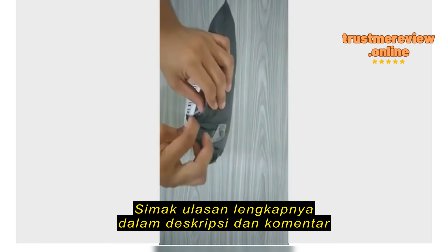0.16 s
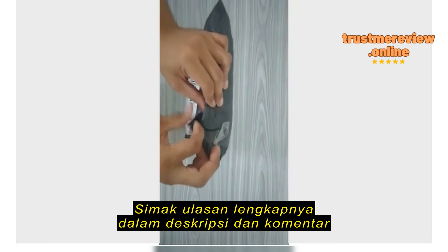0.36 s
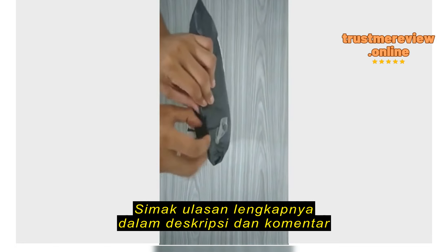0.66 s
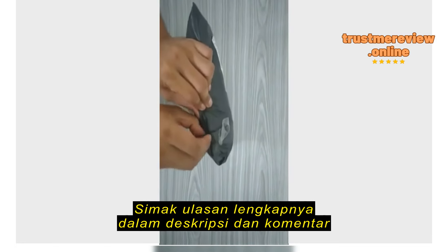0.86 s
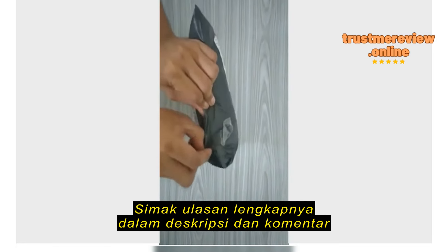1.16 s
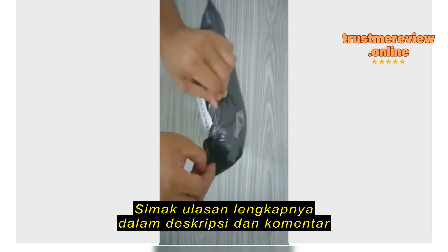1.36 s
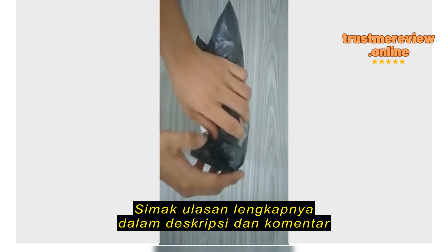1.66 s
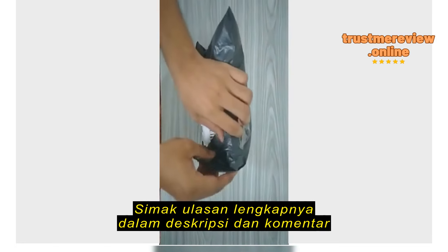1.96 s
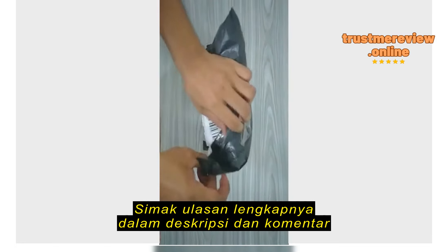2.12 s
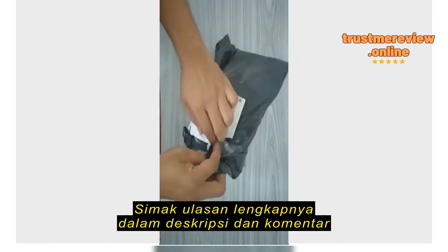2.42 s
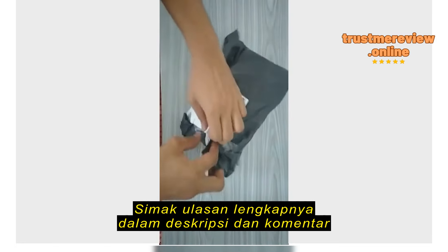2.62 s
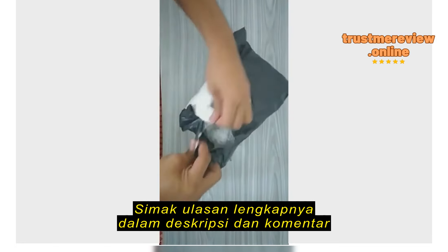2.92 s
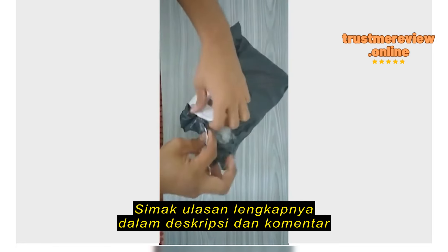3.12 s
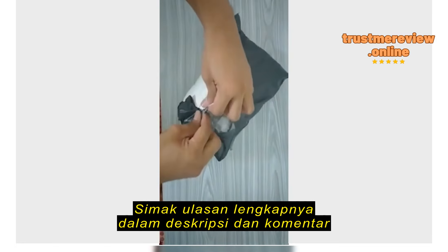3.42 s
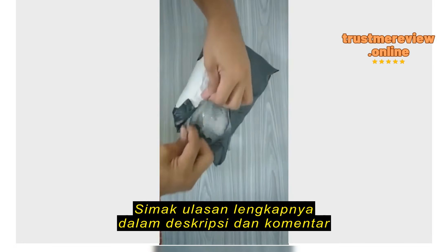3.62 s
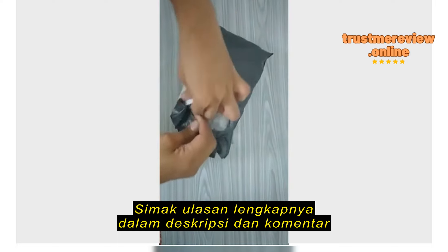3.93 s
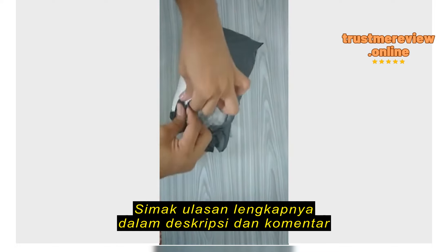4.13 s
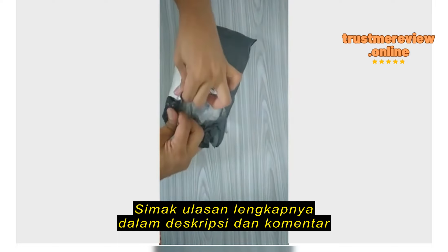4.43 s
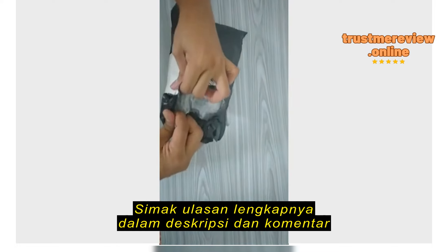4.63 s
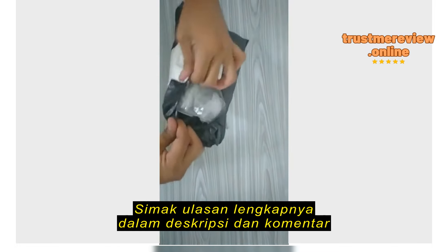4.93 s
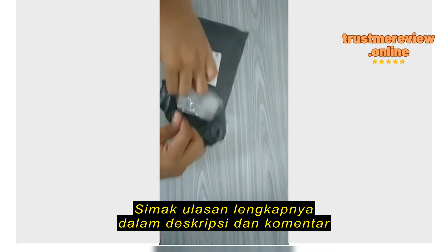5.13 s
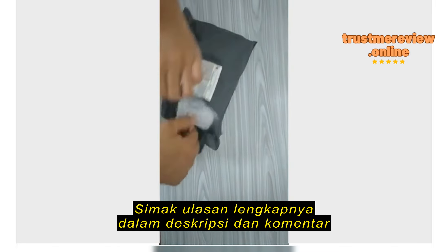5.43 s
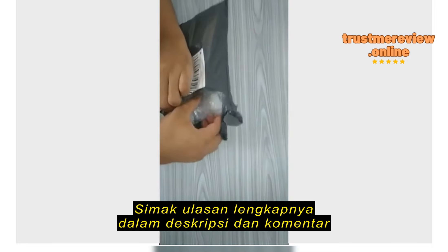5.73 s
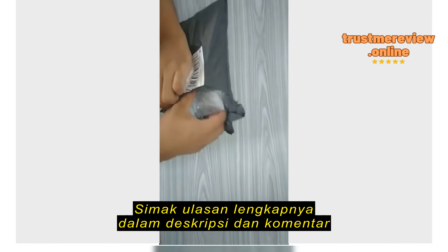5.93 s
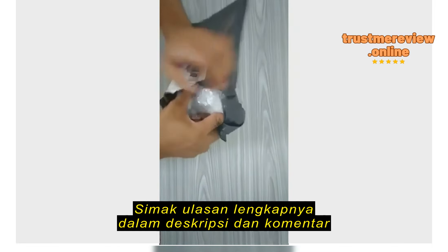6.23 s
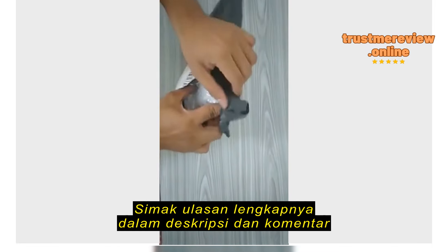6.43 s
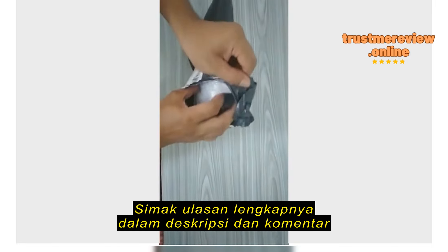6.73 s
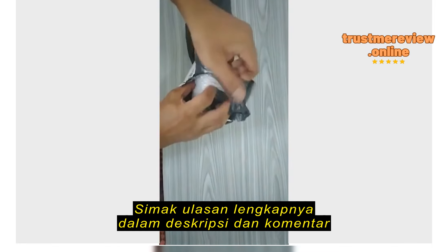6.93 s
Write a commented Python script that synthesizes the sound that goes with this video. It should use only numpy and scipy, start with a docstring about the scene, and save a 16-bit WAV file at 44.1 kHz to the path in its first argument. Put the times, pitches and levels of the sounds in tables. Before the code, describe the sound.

Hands squeeze and pull at a thin plastic mailer bag on a wooden table, making short, uneven bursts of crinkling with sharp little snaps. About two seconds in, the bag tears with one loud crack and a rush of crackle, and the table thumps softly. Crinkling continues as the bundle inside rustles and shuffles. The microphone is close, in a small room with a faint low rumble.

```python
"""A snap and a burst of crackle: hands tear open a thin plastic mailer bag on a wooden table.
Creases in the film buckle as swarms of tiny clicks and a few loud snaps. The bundle inside pops and
shuffles, and the table top booms in its low modes when the bag is slapped down. A small room
reverberates over a low rumble, and a phone close above hears it all through two microphone ports."""
import sys
import numpy as np
from scipy import signal
from scipy.fft import rfft, irfft, next_fast_len
from scipy.io import wavfile

SR = 44100
rng = np.random.default_rng(int(sys.argv[2]) if len(sys.argv) > 2 else 0)


def store_pcm(level_fs):
    """Save levels as 16-bit WAV."""
    pcm = np.round(np.clip(level_fs, -1, 1) * 32767).astype(np.int16)
    wavfile.write(sys.argv[1], SR, np.atleast_2d(pcm).T)


N = 311787
SIZE = next_fast_len(N + SR)
HZ = np.arange(SIZE // 2 + 1) * SR / SIZE + 1e-3
LAG_S, PORT_GAP_S = .00004, .00043  # the left port's delay; travel time from port to port

# Squeezes and pulls of the hands: (full from [s], let go [s], fade [dB/s], crackle level [dB],
# treble tilt [dB/octave], bundle rustle re crackle [dB], shuffle re crackle [dB])
CRUMPLES = [(0.01, 0.15, 112, -43.0, -0.5, -4.0, -12.5), (0.326, 0.399, 348, -50.0, -0.5, -5.5, -11.5),
            (0.39, 0.6, 100.0, -50.0, 0, -4, -9), (0.684, 0.69, 290.0, -52.5, -1, -9, -26.0),
            (0.863, 0.885, 130.0, -46.5, 0.5, -3.5, -13), (1.048, 1.12, 230.0, -54.5, -2.5, -4, -13),
            (1.133, 1.13, 280.0, -51, 3, -7, -15.0), (1.201, 1.235, 380.0, -48.0, 2.0, -5.5, -10),
            (1.263, 1.303, 120.0, -47.0, -1, -6.5, -12), (1.371, 1.42, 340.0, -55.5, -3, -2.5, -18),
            (1.525, 1.524, 210.0, -48.0, -0.5, -6.5, -9), (1.642, 1.73, 160.0, -50.0, -1, -3, -12),
            (1.857, 2, 130.0, -56.5, -2.0, -11, -15), (1.948, 1.9, 82, -50.5, 0.5, -3.5, -8.0),
            (2.128, 2.17, 125, -37.5, -0.5, -4.5, -10), (2.177, 2.196, 400.0, -34.5, -1, -5, -10.0),
            (2.268, 2.6, 80.0, -53.5, -3.5, -3.5, -7), (2.67, 2.68, 370.0, -47.0, -1, -6, -10.5),
            (2.867, 2.966, 170.0, -45.0, -0.5, -6.5, -11.5), (3.035, 3.13, 190.0, -51.0, -1.0, -7, -17.5),
            (3.107, 3.27, 130.0, -48.0, -1.5, -4.5, -9.5), (3.382, 3.45, 70.0, -45.5, -1, -1, -17),
            (3.507, 3.75, 390.0, -52.0, 0, 0, -5), (3.862, 3.974, 190.0, -50.5, -1.5, -5, -15),
            (4.038, 4.048, 400.0, -48.5, 2, -10.0, -6), (4.018, 4.3, 90.0, -52.5, 0, -2, -8),
            (4.192, 4.262, 330.0, -43.5, 0, -7, -10), (4.399, 4.431, 120.0, -44.0, 1.0, -9.5, -11),
            (4.566, 4.66, 80.0, -49.0, 0, -5, -6), (4.76, 4.784, 250.0, -48.5, 1, -12, -9),
            (4.896, 5, 90.0, -50.0, 0, -5.5, -13.0), (5.043, 5.13, 250.0, -44.5, 0.5, -5.0, -12.0),
            (5.171, 5.215, 150.0, -46.5, 0, -9, -11), (5.264, 5.32, 220.0, -44.5, 1.5, -11, -11.0),
            (5.317, 5.54, 200.0, -50.0, 0.5, -5, -6), (5.595, 5.613, 100.0, -50, 0, -5, -9),
            (5.862, 5.85, 180.0, -54.0, 0.5, -11, -25), (6.137, 6.35, 90.0, -56.5, -0.5, -4, -26.0),
            (6.436, 6.452, 320.0, -36.0, 1, -8, -17), (6.49, 6.48, 150.0, -46.5, 0, -4, -15),
            (6.596, 6.691, 240.0, -52.0, -0.5, -4.5, -8.5), (6.711, 6.84, 107, -48.0, 1, -7.5, -11),
            (6.898, 6.96, 170.0, -41.0, 0, -8.5, -12), (7.07, 7.07, 170.0, -54, -4, -11, -7)]
# Resonances of the film, from wide creases to fine: (frequency [Hz], level [dB])
CREASES = [(2300, -3), (3400, 0), (5000, -0.5), (7200, -5.5), (10000, -6.5), (13500, -1)]
# Modes of the bundle: (frequency [Hz], level [dB], T60 [s])
BUNDLE_MODES = [(650, -12, 0.028), (780, -3, 0.018), (1028, 2.5, 0.008), (1400, -5, 0.013),
                (1650, -5, 0.018), (2020, -1, 0.008)]


def crackle(tick_db=-10.5, creep_db=-60, creep_db_per_octave=-2.5):
    """Buckling: stressed film sheds dense clicks and stray ticks, their energy wandering among creases."""
    clicks = film(*swarm(5000, spread_db=2.1, flurry_db=1.1, flurry_hz=60), patchy_db=2, smear_s=.0008)
    ticks = film(*swarm(110, spread_db=1.5, flurry_db=1.6, flurry_hz=5), patchy_db=4.5, smear_s=.0002)
    level_db, tilt_db = np.transpose(CRUMPLES)[3:5, :, None]
    out = 0
    for click, tick, (hz, _) in zip(clicks, ticks, CREASES):
        octaves = np.log2(hz / 7000)
        band = click / rms(sum(clicks)) + undb(tick_db) * tick / rms(sum(ticks))
        envelope = handling(level_db + tilt_db * octaves, creep_db + creep_db_per_octave * octaves)
        out += band * wander(spread_db=1.3, per_s=35) * envelope
    return out


def snaps(count=10):
    """Snap-through: a big crease cracks, then smaller cracks run along the fold for milliseconds."""
    # (time [s], level [dB], then re that level: low bundle modes [dB],
    # high bundle modes and wide creases [dB], fine creases [dB])
    cracks = [(0.006, -31.5, 0.5, -5, -24), (0.255, -32, -30, -19.5, -18), (0.5234, -31, -17, -30.5, -15),
              (0.6754, -31, -40.5, -25.5, -10), (0.752, -40, -30, -30, -10), (0.828, -43, -28, -31.5, -9),
              (0.8473, -19, -41, -32, -18), (0.9486, -36, -30, -30, -12), (1.09, -37, -30, -25, -12),
              (1.183, -37, -35, -35, -20), (1.195, -39, -29.5, -33, 2.5), (1.207, -37, -30, -30, -7),
              (1.256, -15, -27, -19, -14.5), (1.3884, -31, -32, -28, -18), (1.5065, -41, -30, -30, -12),
              (1.6633, -27, -28, -24, -15.5), (1.7064, -32, -32, -30, -12), (1.83, -37.5, -30, -12, -13.5),
              (1.849, -26, -45, -29, -19), (2.116, -30, -7, -10, -20), (2.1271, 0.5, -30.5, -28.5, -19),
              (2.165, -11.5, -12.5, -21, -12), (2.181, -19, -9, -18, -12), (2.2884, -22.5, -35, -24, -28),
              (2.6597, -31, -21, -29.5, -17.5), (2.6794, -23.5, -24, -40, -19),
              (2.8096, -42, -30, -30, -13), (3.026, -34, -30, -30, -14), (3.041, -27, -15, -32, -23.5),
              (3.0764, -30, -26, -31, -21), (3.1186, -25.5, -15, -32, -26), (3.2135, -14.5, -20, -12, -27),
              (3.4137, -24.5, -2, -1.5, -18.5), (3.4946, -20.5, -33, -28, -16.5),
              (3.915, -32, -20, -7, -21), (3.926, -42, -7, -25, -20), (3.9444, -31, -23.5, -24, -10),
              (3.962, -34, -22, -30, -12), (4.0101, -32, -36, -29, -6.5), (4.0644, -31.5, -21, -17.5, -21),
              (4.09, -27, -33.5, -25, -16), (4.281, -34, -30, -30, -17), (4.5753, -28.5, -10, -37, -20),
              (4.593, -28, -30, -35, -17), (4.598, -30.5, -30, -35, -15), (4.6327, -30, -23, -35, -14),
              (4.6447, -28, -19, -40, -9), (4.7195, -31, -39, -39, -5.5), (4.811, -37, -35, -35, -13),
              (4.8664, -27.5, -45, -40, -11), (4.908, -36, -35, -35, -10), (4.967, -33, -35, -35, -14),
              (5.108, -33, -35, -35, -12), (5.437, -35, -35, -35, -8), (5.49, -33, -35, -35, -8),
              (5.62, -36, -35, -35, -8), (5.69, -36, -25, -25, -20), (5.7389, -33, -32, -23, -20),
              (5.8253, -43, -28, -33, -12), (5.8486, -32, -41, -34, -20), (5.9472, -35.5, -35, -36, -10.5),
              (6.1097, -36.5, -18, -20, -18), (6.139, -30.5, -26, -23.5, -23),
              (6.1604, -36.5, -25, -25, -12.5), (6.2694, -35.5, -16, -28.5, -10),
              (6.345, -41, -27, -26.5, -10), (6.388, -38, -8, -20, -15), (6.429, -31, -13, -28.5, -12),
              (6.6224, -35, -25, -25, -13), (6.739, -33, -27, -30, -13)]
    onset_s, level_db, deep_db, pop_db, fine_db = np.transpose(cracks)[:, :, None]
    jitter, place, polarity = rng.random((len(cracks), count, 3)).transpose(2, 0, 1)
    later = np.arange(count) > 0
    delay_s = .00066 + .006 * (np.arange(count) + jitter) / count * later
    ragged_db = -9.5 - .09 * level_db - 670 * delay_s - 5.8 * place  # weaker snaps are more ragged
    size = undb(level_db) * np.where(later, np.sign(polarity - .5) * undb(ragged_db), 1)
    lag_s = (LAG_S + .25 * PORT_GAP_S * (2 * place - 1) * later).ravel()
    s = (onset_s + delay_s).ravel()

    def impulses(db):
        return s, (size * undb(db)).ravel(), lag_s

    middle, wide, fine = (film(*impulses(db), patchy_db=1, smear_s=.00005) for db in (0, pop_db, fine_db))
    crack = undb(15) * sum(wide[:2]) + undb(9.5) * sum(middle[2:4]) + undb(25.5) * sum(fine[4:])
    deep = bundle_ring(arrive(*impulses(deep_db)), BUNDLE_MODES[:3])
    pop = bundle_ring(arrive(*impulses(pop_db)), BUNDLE_MODES[3:])
    return crack + undb(-.5) * deep + undb(2) * pop


def film(s, size, lag_s, patchy_db, smear_s):
    """Resonance: clicks excite one band per crease size, each with a random strength and delay."""
    scatter = rng.standard_normal((len(s), len(CREASES), 2)).T
    bands = []
    for (hz, db), gain, late in zip(CREASES, *scatter):
        resonance = signal.butter(2, [hz * .73, hz * 1.184], "band", fs=SR, output="sos")
        clicks = arrive(s + smear_s * abs(late), size * undb(patchy_db * gain), lag_s)
        bands.append(undb(db) * signal.sosfilt(resonance, clicks))
    return bands


def swarm(per_s, spread_db, flurry_db, flurry_hz):
    """Crackling noise: random clicks of power-law size, in flurries: (time [s], amplitude, lag [s])."""
    when, strength, polarity, place = rng.random((int(per_s * N / SR), 4)).T
    side = 2 * place - 1
    swells = rng.standard_normal(int(flurry_hz * N / SR) + 2)
    flurry = np.interp(when, np.linspace(0, 1, len(swells)), swells)
    db = -spread_db * np.log(1 - strength).clip(-7) + flurry_db * flurry
    size = np.sign(polarity - .5) * undb(db + np.outer([1, -1], .59 * side))
    return when * N / SR, size, LAG_S + .8 * PORT_GAP_S * side


def handling(db, creep_db, rise_db_per_s=358):
    """Incoherent addition: crumples rise, hold and fade, their powers adding to the settling bag's."""
    full_s, let_go_s, fade = np.transpose(CRUMPLES)[:3, :, None]
    t = np.arange(0, N + 64, 64) / SR
    rise_db = -rise_db_per_s * (full_s - t).clip(0)
    fall_db = -fade * (t - np.maximum(let_go_s, full_s)).clip(0)
    power = np.sum(undb(db + rise_db + fall_db) ** 2, axis=0) + undb(creep_db) ** 2
    return np.interp(np.arange(N) / SR, t, np.sqrt(power))


def bundle_friction(grip=.45):
    """Friction: the bundle rustles, its ring time cut by gripping fingers, and shuffles on the table."""
    level_db, _, rustle_db, shuffle_db = np.transpose(CRUMPLES)[3:, :, None]
    rubs = arrive(*swarm(1200, spread_db=1.26, flurry_db=3.06, flurry_hz=30))
    rustle = bundle_ring(rubs, [(hz, db, grip * t60) for hz, db, t60 in BUNDLE_MODES])
    slips = arrive(*swarm(1500, spread_db=1.7, flurry_db=1.3, flurry_hz=22))
    dull = colour([(80, -14), (135, 2.5), (220, -2), (330, -1.5), (450, -5), (600, -17.5), (1500, -14.5)])
    shuffle = through(slips, dull)
    return (handling(level_db + rustle_db, creep_db=-66) * rustle / rms(rustle)
            + handling(level_db + shuffle_db, creep_db=-70) * shuffle / rms(shuffle))


def bundle_ring(x, modes):
    """Radiation from a small body: the bundle rings briefly and sends out little bass."""
    return through(x, ring(modes) * highpass(400) ** 2)


def knocks(cycles_to_fade=5.5):
    """Damped oscillation: fingers knock the soft bundle, which thumps for a few cycles."""
    # (time [s], level [dB], frequency [Hz])
    blows = [(2.2, -44, 200), (3.252, -42, 340), (3.961, -40, 300.3), (3.972, -43, 140), (4.037, -39, 260),
             (4.068, -39, 300), (4.186, -42, 200), (4.23, -39, 300), (4.259, -45, 110), (4.47, -47, 95),
             (4.62, -47, 170)]
    t = np.arange(SR // 10) / SR
    attack = 1 - np.exp(-t / .001)
    out = np.zeros(N + len(t))
    for s, db, hz in blows:
        start = int(s * SR)
        decay = 1000. ** (-t * hz / cycles_to_fade)
        out[start:start + len(t)] += undb(db) * np.sin(2 * np.pi * hz * t) * attack * decay
    return out[:N]


def table_boom(contact_s=.0093):
    """Impact excitation: soft, long contacts drive the low modes of the table top."""
    # (time [s], level [dB])
    thuds = [(.09, -53), (.86, -57.5), (1.251, -58), (1.95, -59), (2.139, -44), (2.198, -43), (2.248, -45),
             (2.88, -51.5), (3.3, -53), (3.419, -51.5), (3.91, -57.5), (4.461, -61), (6.42, -60)]
    # (frequency [Hz], level [dB], T60 [s])
    top_modes = [(64.4, -3, 0.94), (78.6, 1, 0.69), (42.2, -6, .3)]
    s, db = np.transpose(thuds)
    balance_db = np.outer([1, -1], .42 * rng.standard_normal(len(s)))
    impacts = arrive(s, undb(db + balance_db), np.zeros_like(s))
    contact = np.hanning(int(contact_s * SR))
    force = signal.fftconvolve(impacts, contact[None] / contact.sum())[:, :N]
    return through(force, ring(top_modes) * highpass(50))


def room(x, t60_s=.35, level_db=-7.5, cutoff_hz=15900):
    """Diffuse reverberation: dense echoes from all sides decay exponentially, slightly dulled."""
    when, polarity, place = rng.random((12000, 3)).T
    s = .003 + .4 * when
    echoes = arrive(s, np.sign(polarity - .5) * 1000. ** (-s / t60_s), PORT_GAP_S * (2 * place - 1))
    echoes /= np.sqrt(np.sum(echoes ** 2) / 2)
    return through(x.mean(axis=0), undb(level_db) * rfft(echoes, SIZE) / (1 + 1j * HZ / cutoff_hz))


def rumble(level_db=-62, hiss_db=-72):
    """Coherence: the low noise of the house is nearly alike at both ports; microphone hiss is not."""
    # Spectrum ahead of the treble roll-off: (frequency [Hz], level [dB])
    spectrum = [(20, -12), (32, 0.5), (70, -2), (110, -9.5), (250, -17), (600, -10.5), (1500, -10.5)]
    mid, side, left, right = rng.standard_normal((4, N))
    low = through(mid + .24 * np.outer([1, -1], side), colour(spectrum) / (1 + 1j * HZ / 1500) ** 2)
    return undb(level_db) * low / rms(low) + undb(hiss_db) * np.array([left, right])


def ports(x):
    """Cavity resonance: each port is flat below its peak and falls above it; a little leaks past."""
    # Left, right: (resonance [Hz], bandwidth [Hz], gain [dB], leak [dB])
    cavities = [(7170, 1010, -1, -9.5), (10700, 2830, -0.5, -36)]
    responses = [undb(db) / (1 - (HZ / hz) ** 2 + 1j * HZ * width / hz ** 2)
                 - undb(leak_db) * 1j * HZ / hz for hz, width, db, leak_db in cavities]
    return through(x, np.array(responses))


def arrive(s, size, lag_s):
    """Path difference: each click reaches the left port lag_s after the right."""
    at = np.clip(np.round((s + np.outer([.5, -.5], lag_s)) * SR).astype(int), 0, N - 1)
    size = np.broadcast_to(size, at.shape)
    return np.array([np.bincount(at[k], size[k], N) for k in range(2)])


def ring(modes):
    """Modal superposition: the frequency response of a sum of decaying sines."""
    t = np.arange(SR) / SR
    partials = (undb(db) * np.sin(2 * np.pi * hz * t) * 1000. ** (-t / t60) for hz, db, t60 in modes)
    return rfft(sum(partials), SIZE)


def colour(points):
    """Minimum phase: a causal response through points of (frequency [Hz], level [dB])."""
    hz, db = np.transpose(points)
    cepstrum = irfft(np.log(undb(np.interp(np.log(HZ), np.log(hz), db))), SIZE)
    cepstrum[1:SIZE // 2] *= 2
    cepstrum[SIZE // 2 + 1:] = 0
    return np.exp(rfft(cepstrum))


def wander(spread_db, per_s):
    """Amplitude modulation: a gain drifts between random levels."""
    db = spread_db * rng.standard_normal(int(per_s * N / SR) + 2)
    return undb(np.interp(np.arange(N), np.linspace(0, N, len(db)), db))


def highpass(hz):
    return 1j * HZ / (hz + 1j * HZ)


def through(x, response):
    return irfft(rfft(x, SIZE) * response, SIZE)[..., :N]


def undb(db):
    return 10 ** (np.asarray(db) / 20)


def rms(x):
    return np.sqrt(np.mean(x ** 2))


def scene():
    """Superposition: the bag, its echoes, the table and the background add."""
    bag = crackle() + bundle_friction() + snaps() + knocks()
    return bag + room(bag) + table_boom() + rumble()


def record(dry, drive=1.15, top_hz=15600):
    """Soft saturation rounds the loudest crack after the ports colour it; a low-pass cuts the top."""
    rounded = np.tanh(ports(dry) * drive) / drive
    return signal.sosfilt(signal.ellip(10, .2, 70, top_hz, fs=SR, output="sos"), rounded)


dry = scene()
out = record(dry)
store_pcm(out)
```